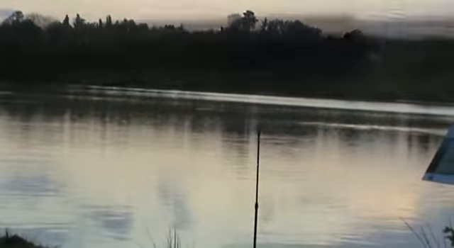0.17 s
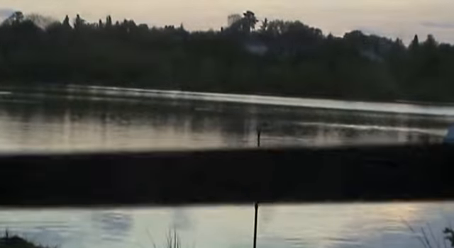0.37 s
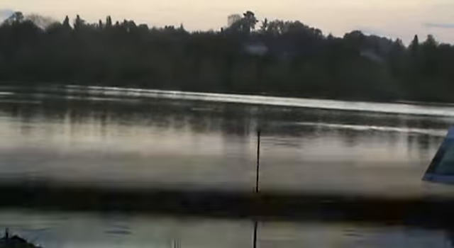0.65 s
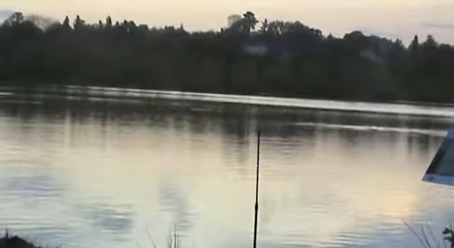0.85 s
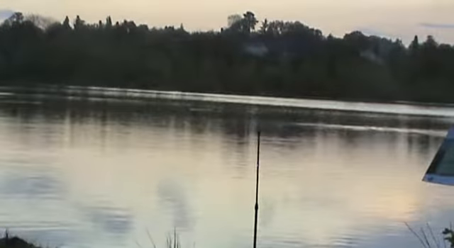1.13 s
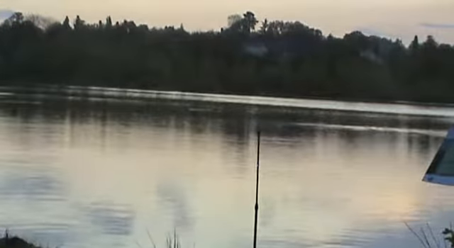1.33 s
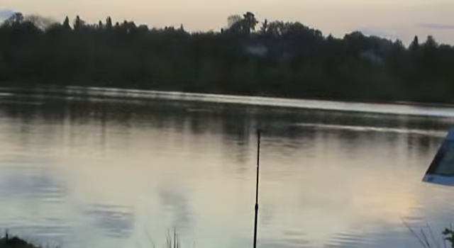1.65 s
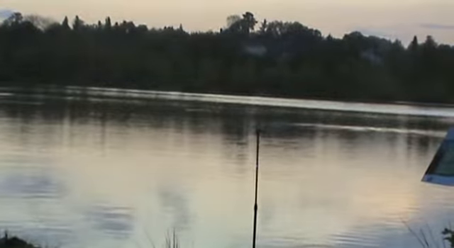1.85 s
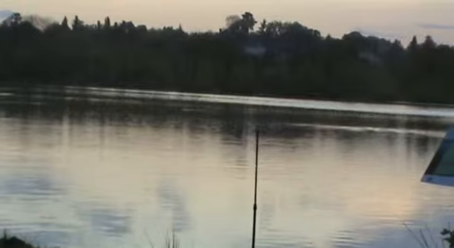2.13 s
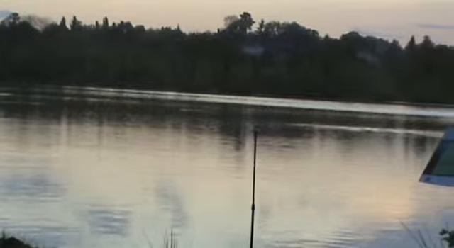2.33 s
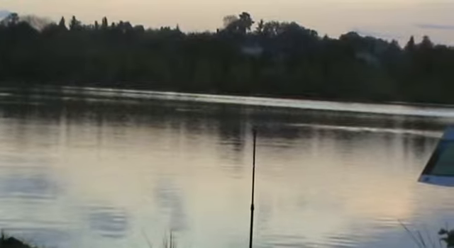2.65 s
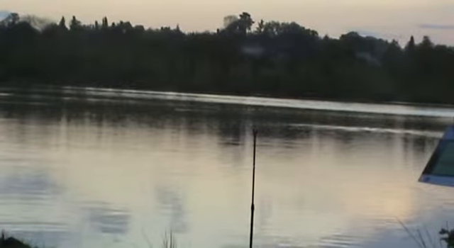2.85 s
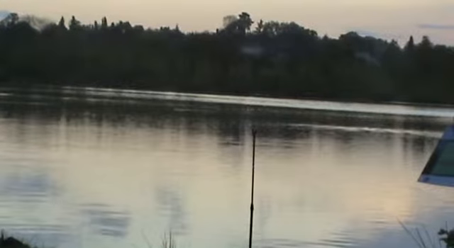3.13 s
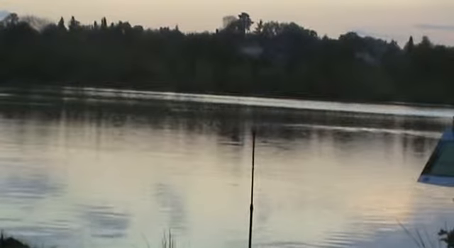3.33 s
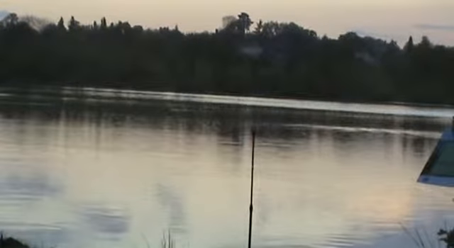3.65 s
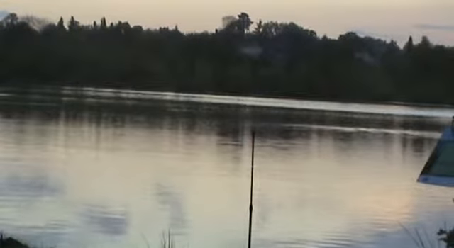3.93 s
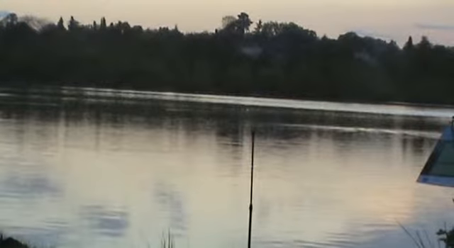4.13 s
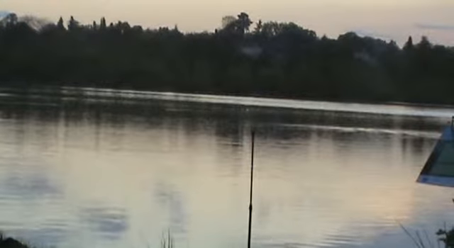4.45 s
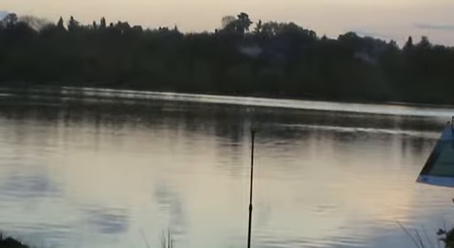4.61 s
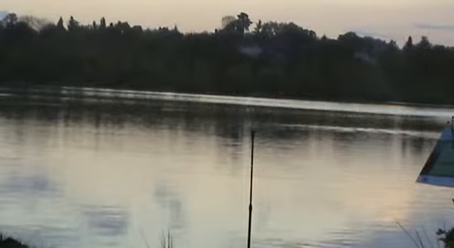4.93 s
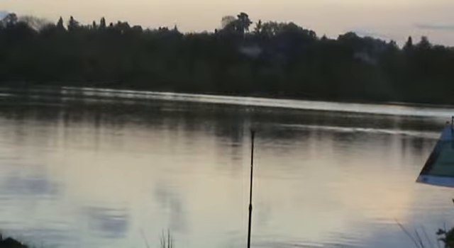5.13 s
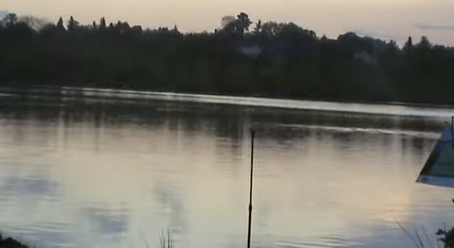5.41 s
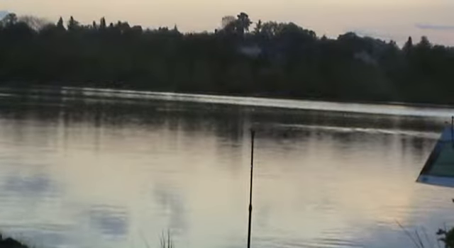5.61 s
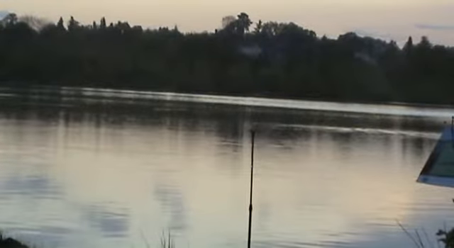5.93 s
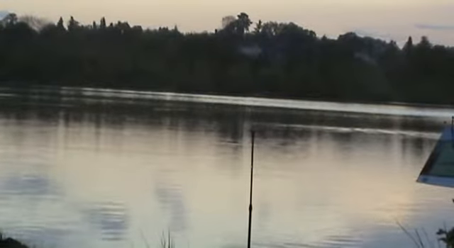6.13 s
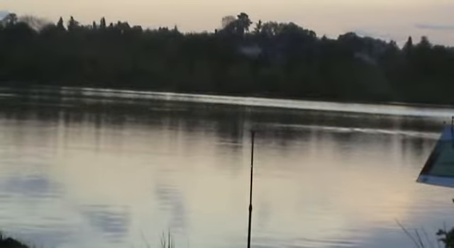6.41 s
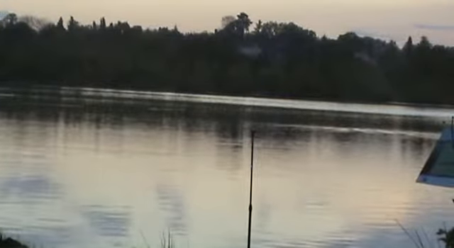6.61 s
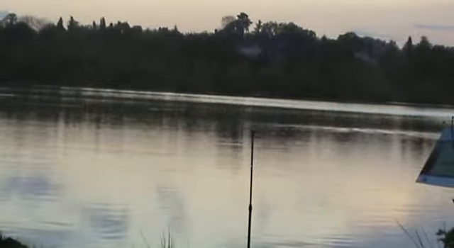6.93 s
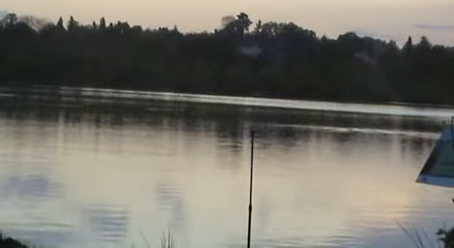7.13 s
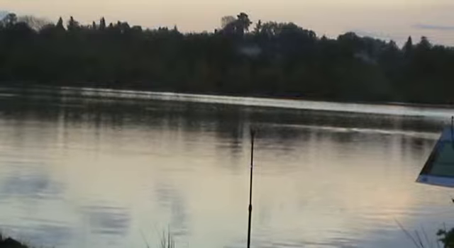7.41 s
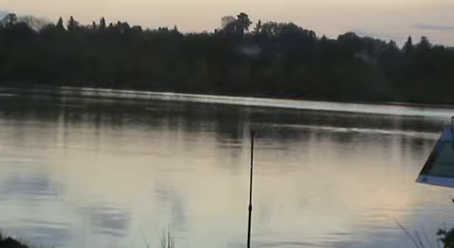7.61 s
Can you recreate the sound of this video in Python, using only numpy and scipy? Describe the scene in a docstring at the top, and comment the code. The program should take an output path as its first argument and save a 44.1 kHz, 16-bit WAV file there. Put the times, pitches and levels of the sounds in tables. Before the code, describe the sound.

Sharp tackle snaps, light knocks and a gear thump close by, with rustling sleeves, over faint birds piping across a quiet lake.

```python
"""A still lake shore at dawn. Close by, an angler handles tackle: filtered pulses make snaps and knocks,
damped modes make thumps, shaped noise makes rustling sleeves and scuffs, a short glide a line squeak.
Bending near-sine notes make a bird piping on the right, slurring birds on the left, chirps and a far
twitter. A hoarse yelp and a dove's coo are unsteady harmonics; behind lie noise for the air, a low drone
and soft microphone buffets."""
import sys
import numpy as np
from scipy import signal
from scipy.fft import rfft, irfft, next_fast_len
from scipy.io import wavfile

SR = 44100
rng = np.random.default_rng(int(sys.argv[2]) if len(sys.argv) > 2 else 0)


def waveform_to_disk(signal):
    """Save audio, clipped to [-1, 1], as 16-bit WAV at the path in sys.argv[1]."""
    frames = np.transpose(np.atleast_2d(signal))
    scaled = np.clip(frames, -1, 1) * 32767
    samples = np.round(scaled).astype(np.int16)
    wavfile.write(sys.argv[1], SR, samples)


N = 342171
TIME_S = np.arange(N) / SR

# Left-right is the left channel's level above the right's.
# Hard snaps of the tackle: (time [s], level [dB], pitch factor [ratio])
SNAPS = [(0.648, -28, 1.23), (1.7803, -43, 1.1), (1.821, -42, 0.91), (5.7564, -28, 1.06),
         (5.7666, -15.5, 1.03), (5.783, -8, 1.024), (5.864, -35, 0.96), (5.8903, -13.5, 1.01),
         (5.9259, -31.5, 0.92), (6.6517, -29.5, 1.1), (6.6534, -29.5, 0.47), (7.288, -34, 0.81)]
# Snap spectrum before the pitch factor: (frequency [Hz], relative level [dB])
SNAP_SPECTRUM = [(200, -42), (1500, -9), (2700, -7), (3600, -20.5), (4400, -8), (5100, -8), (6100, 4.5),
                 (7700, -1.5), (9500, -9), (13000, -29)]
# Single knocks on the rod: (time [s], level [dB], pitch [Hz])
KNOCKS = [(.2497, -45.5, 1180), (.314, -35, 736), (.8915, -43, 760), (1.431, -47.5, 1100),
          (1.5452, -47, 970), (2.2762, -40, 1120), (2.965, -47.5, 1070), (5.377, -43, 859),
          (5.5128, -45, 760), (5.7599, -25.5, 1930), (5.8412, -31.5, 1660), (5.8912, -34, 1660),
          (6.6521, -23, 1130), (6.8528, -42.5, 1340), (7.2992, -47, 1000), (7.7319, -41, 780)]
# Knock spectrum: (multiple of its pitch [ratio], relative level [dB])
KNOCK_SPECTRUM = [(.1, -17), (.45, -8), (.8, -1), (1.1, 1.5), (1.5, -12), (2.2, -12), (5, -30)]
# Clatters at the far end of the rod: (time [s], length [s], first bounce level [dB], mean pitch [Hz])
CLATTERS = [(4.775, 0.013, -46, 1300), (4.7856, 0.014, -33, 1050), (5.414, .03, -47.5, 1240),
            (5.7622, 0.019, -27.5, 1530), (5.779, 0.022, -30, 1460), (5.811, .014, -35.5, 1650),
            (5.845, .022, -32.5, 1460), (5.892, .03, -39.5, 1590), (6.652, 0.0073, -28.5, 1157)]
# Modes of the rod and its rest: (frequency [Hz], relative level [dB], t60 [s])
ROD_MODES = [(1055, 8.5, 0.2), (1253, -1, 0.18), (1277, 18.5, 0.033), (1544, 17, 0.081), (1950, -18, 0.12),
             (2060, 1.5, 0.31)]
# Thumps of gear set down: (time [s], level [dB], pitch factor [ratio], left-right [dB])
THUMPS = [(.041, -44.5, 0.78, -1), (.3145, -40.5, 1.17, -1), (.3325, -35.5, 1.94, -1), (1.80, -50, 0.82, 1),
          (6.6535, -15.5, 0.992, -3), (7.2701, -33, 1.26, -3)]
# Modes of that gear before the pitch factor: (frequency [Hz], relative level [dB], t60 [s])
GEAR_MODES = [(135, -27, .035), (236, 10.5, 0.024), (269, -9.5, 0.12), (370, -14, 0.11), (548, -2, 0.035),
              (636, -16, 0.071), (1090, -27, .04), (2530, -8.5, 0.013)]
# Sleeve rustle: (time [s], dull rub level [dB], bright swish level [dB])
SLEEVES = [(0, -63.5, -65), (.5, -65, -74), (.92, -60.5, -67), (1.1, -65, -71.5), (2.1, -62.5, -65.5),
           (2.48, -56, -58.5), (2.8, -66.5, -71), (3.4, -84, -80), (4, -75, -67.5), (4.68, -64.5, -61),
           (4.9, -64, -73), (5.2, -65.5, -69), (5.44, -57.5, -63.5), (6.05, -67, -64.5), (6.75, -60, -65),
           (7.1, -66.5, -69), (7.38, -56, -57.5), (7.6, -63, -71)]
# Scuffs of cloth and hand: (time [s], length [s], level [dB], relative hollow level [dB], left-right [dB])
SCUFFS = [(0.03, 0.039, -48.5, -8.5, -7), (0.058, 0.019, -48, -1.5, -6), (.315, 0.065, -44, 0.5, -5.5),
          (.37, 0.069, -60.5, 2.5, -5), (.595, .11, -57, -8.5, -8), (0.866, 0.19, -61, -7, -9),
          (2.342, 0.083, -50, -27, -1), (3.567, 0.23, -62.5, -20, 0), (4.101, 0.16, -58, -16, -1),
          (4.263, 0.074, -54.5, -29, 1), (4.424, 0.024, -51, -21, -2), (4.44, 0.082, -54.5, -14, 0),
          (4.534, 0.012, -48, -20, 1), (4.738, .085, -46, -1.5, -6), (4.805, 0.052, -53.5, -13, -6),
          (4.949, .075, -54.5, -9, -7), (5.002, 0.084, -51.5, -7.5, -6.5), (6.654, .19, -56, -6, -7)]
# Dull rub of cloth: (frequency [Hz], relative level [dB])
RUB_SPECTRUM = [(100, -8), (250, 3), (450, 3.5), (750, 2), (1400, 0.5), (2500, 0), (4000, -6.5),
                (8000, -44)]
# Bright swish of cloth: (frequency [Hz], relative level [dB])
SWISH_SPECTRUM = [(500, -58), (2500, -3), (4500, 0), (6300, 2), (8500, 1), (11000, -8.5), (13500, -19)]
# Scuff scrape: (frequency [Hz], relative level [dB])
SCRAPE_SPECTRUM = [(300, -59), (1500, -2.5), (3000, -1), (4500, -1), (7500, 1), (9500, -3), (11500, -13),
                   (13500, -43)]
# Sizzle of light scuffs: (frequency [Hz], relative level [dB])
SIZZLE_SPECTRUM = [(800, -6), (3000, -0.5), (4500, -8), (5500, 3), (7500, 2), (9000, -3), (11000, -3),
                   (13500, -13)]
# Hollow tackle under a scuff: (frequency [Hz], relative level [dB])
HOLLOW_SPECTRUM = [(60, -37), (200, 4.5), (700, -2.5), (1100, -0.5), (1500, 2), (2000, -7.5), (3000, -7),
                   (5000, -26)]
# Squeak of line under the fingers: (time [s], length [s], start [Hz], end [Hz], level [dB])
SQUEAK = (5.0325, .012, 6100, 8500, -44)
# Piping bird's sagging notes: (time [s], length [s], start [Hz], level [dB])
PIPES = [(0.072, .13, 2890, -66), (0.275, .047, 2890, -67), (1.32, 0.062, 3050, -62.5),
         (1.414, 0.043, 3140, -61), (1.462, 0.064, 3104, -57.5), (1.528, .055, 3100, -65.5),
         (1.834, 0.079, 3080, -60.5), (1.966, .15, 3066, -58.5), (2.466, 0.08, 3070, -55),
         (2.599, 0.14, 3077, -55.5), (3.077, .16, 3035, -55.5), (3.313, .123, 3102, -56.5),
         (3.728, 0.086, 3016, -58.5), (3.875, .15, 2990, -59.5), (4.43, 0.14, 3020, -67.5),
         (4.663, 0.094, 3100, -64), (5.175, .16, 2966, -67), (5.401, .11, 3090, -65)]
# Slurred notes of the birds on the left: (time [s], length [s], start [Hz], middle [Hz], end [Hz], level [dB])
SLURS = [(.876, .17, 1850, 2314, 2230, -59.5), (.934, 0.076, 2750, 2266, 1600, -62.5),
         (0.99, .09, 2550, 2990, 2630, -65.5), (1.084, 0.043, 2380, 2470, 2510, -62.5),
         (1.331, .12, 2000, 1710, 1590, -64.5), (1.605, 0.14, 2540, 1996, 2260, -61),
         (1.982, 0.051, 2450, 2800, 3080, -64.5), (3.057, .036, 2400, 2290, 2180, -68),
         (3.313, .071, 2400, 2290, 2290, -71), (3.855, .18, 1000, 1073, 1330, -67.5),
         (4.23, 0.052, 2120, 2080, 2330, -68.5), (4.335, 0.048, 2050, 2230, 2110, -67.5),
         (5.462, 0.156, 1990, 2086, 2020, -61), (5.587, .052, 2246, 2390, 2380, -65),
         (5.933, 0.144, 3450, 3390, 3370, -71), (6.055, 0.048, 2500, 2550, 2540, -64),
         (6.16, 0.071, 2600, 2940, 3320, -61.5), (6.53, .15, 1930, 1890, 1923, -69),
         (6.927, .05, 2230, 2275, 2250, -67.5)]
# Nearest small birds' straight glides: (time [s], middle pitch [Hz], total glide [Hz], level [dB])
CHIRPS = [(.475, 3970, 600, -67.5), (.85, 3330, -250, -63.5), (1.25, 3800, -700, -69),
          (1.595, 3380, -1300, -66), (5.253, 4200, 700, -66), (5.515, 5600, -280, -66),
          (5.561, 4070, -900, -70), (5.675, 4600, -1400, -66), (5.945, 4830, -900, -66),
          (6.107, 3900, -1000, -66.5), (6.22, 4770, -900, -68), (6.5, 3730, 350, -74),
          (6.89, 4470, -800, -68), (7.405, 3040, -200, -60.5), (7.452, 2820, -200, -72),
          (7.508, 3080, -200, -66.5), (7.623, 3140, -700, -66.5)]
# Water bird's falling yelp: (time [s], pitch [Hz], level [dB])
YELP = [(3.87, 700, -86), (3.89, 677, -59), (3.935, 611, -57.5), (3.962, 542, -61.5), (3.99, 525, -80)]
# Far dove's coo: (time [s], pitch [Hz], level [dB])
COO = [(3.2, 506, -90), (3.32, 521.5, -73.5), (3.55, 522, -84), (3.72, 514, -80)]
# Open air: (frequency [Hz], relative level [dB])
AIR_SPECTRUM = [(15, -49), (25, -11.5), (76, 1.5), (186, -6.5), (249, -8), (445, -10), (508, -10.5),
                (1150, -10.5), (1420, -12), (2350, -19), (3060, -18.5), (4090, -18.5), (5330, -21.5),
                (12700, -24.5), (13800, -29)]
# Open air between the channels: (frequency [Hz], likeness [0 to 1])
AIR_LIKENESS = [(30, 0.87), (100, 1), (300, 0.12), (1000, 0.06), (3000, 0.059), (12000, 0.57)]
# Buffets as the microphone is handled: (peak time [s], time to change by BUFFET_FADE_DB [s], level [dB])
BUFFETS = [(.31, 0.084, -45), (6.255, 0.042, -44), (6.4, 0.22, -51), (6.68, 0.49, -53)]

SNAP_SIDE_DB, ROD_SIDE_DB = -6.5, -4.5
KNOCK_TRAVEL_S, BOUNCE_TRAVEL_S = 0.00039, 0.003
BOUNCE_GAP_S, BOUNCE_GAP_JITTER, BOUNCE_FADE_DB, BOUNCE_DETUNE = 0.005, 0.358, 15, 0.08
SCUFF_RISE_SHARE = 0.4
PIPE_SAG_MIDDLE_HZ, PIPE_SAG_END_HZ, PIPE_SIDE_DB = 136.2, 173, -8.5
SLUR_SIDE_DB = 4.5
CHIRP_S, CHIRP_SIDE_DB = 0.042, -7.5
BUFFET_FADE_DB = 25


def amp(db):
    """Decibels to gain."""
    return 10 ** (np.asarray(db) / 20)


def unit(x):
    """Scales to an rms of 1."""
    return x / np.sqrt(np.mean(x ** 2) + 1e-20)


def read(points, hz):
    """Reads a spectrum on a log-frequency axis."""
    f, value = np.transpose(points)
    return np.interp(np.log(hz + 1e-6), np.log(f), value)


def follow(rows):
    """Interpolates a timed table's columns at every sample."""
    times_s, *columns = np.transpose(rows)
    return [np.interp(TIME_S, times_s, column) for column in columns]


def pan(side_db):
    """Left and right gains, of mean 1, for a level difference."""
    gains = amp([[side_db / 2], [-side_db / 2]])
    return gains / gains.mean()


def add(mix, start_s, sound):
    """Mixes a stereo sound in at a given time."""
    part = mix[:, max(round(start_s * SR), 0):][:, :sound.shape[1]]
    part += sound[:, :part.shape[1]]


def drift(rate_hz):
    """Smooth noise of rms 1, low-passed by a Gaussian of this width."""
    lowpass = np.exp(-(np.fft.rfftfreq(N, 1 / SR) / rate_hz) ** 2)
    return unit(irfft(rfft(rng.standard_normal(N)) * lowpass, N))


def colour(x, spectrum):
    """Filters a long sound by a spectrum, to rms 1."""
    size = next_fast_len(N)
    gain = amp(read(spectrum, np.fft.rfftfreq(size, 1 / SR)))
    return unit(irfft(rfft(x, size) * gain, size)[..., :N])


def pair(length, apart):
    """Noise shared by both channels, plus a part of opposite sign in each."""
    common, side = rng.standard_normal((2, length))
    return unit(np.array([common + apart * side, common - apart * side]))


def shore(x, t60_s):
    """Diffuse echo from the trees round the lake, as decaying noise."""
    t = np.arange(SR) / SR
    tail = rng.standard_normal((2, SR)) * amp(-60 * t / t60_s) * (1 - np.exp(-t / 0.014))
    return signal.fftconvolve(x, unit(tail) / np.sqrt(SR), axes=1)[:, :N]


def modes_ring(modes, t, pitch=1.0, signs=None):
    """Sums decaying sines, one a mode."""
    signs = np.ones(len(modes)) if signs is None else signs
    return sum(sign * amp(db - 60 * t / t60_s) * np.sin(2 * np.pi * hz * pitch * t)
               for sign, (hz, db, t60_s) in zip(signs, modes))


def impact(spectrum, travel_s=0., pitch_hz=1000., size=4096):
    """A minimum-phase pulse of peak 1; bending waves carry its treble ahead of its bass."""
    hz = np.fft.rfftfreq(size, 1 / SR)
    log_gain = np.log(amp(read(spectrum, hz)))
    mirrored = np.r_[log_gain, log_gain[-2:0:-1]]
    phase = -signal.hilbert(mirrored).imag[:len(hz)]
    lag = 4 * np.pi * travel_s * np.sqrt(pitch_hz * hz)  # group delay is travel_s at pitch_hz
    pulse = irfft(np.exp(log_gain + 1j * (phase - lag)))[:size // 2]
    return pulse / abs(pulse).max()


def rattle(pulse, ring_db, ring_t60_s, tail_db, tail_t60_s):
    """A pulse, its quick scattering inside the tackle, and a faint tail from the bank."""
    t = np.arange(SR // 4) / SR
    decay = amp(ring_db - 60 * t / ring_t60_s) + amp(tail_db - 60 * t / tail_t60_s)
    response = pair(len(t), 0.31) * decay * (1 - np.exp(-t / 0.00023))
    response[:, 0] = 1  # direct pulse
    return signal.fftconvolve(pulse[None], response, axes=1)


def blows():
    """Knocks, and clatters as uneven runs of fading bounces: (time [s], level [dB], pitch [Hz], travel [s])."""
    out = [(*row, KNOCK_TRAVEL_S) for row in KNOCKS]
    for start_s, length_s, first_db, hz in CLATTERS:
        after_s = 0
        for gap_shift, detune in rng.uniform(-1.1, 1, size=(20, 2)):
            if after_s < length_s:
                db = first_db - BOUNCE_FADE_DB * after_s / length_s
                out.append((start_s + after_s, db, hz * (1 + BOUNCE_DETUNE * detune), BOUNCE_TRAVEL_S))
            after_s += BOUNCE_GAP_S * (1 + BOUNCE_GAP_JITTER * gap_shift)
    return out


def tackle(rod_db=-35):
    """Sharp snaps, and knocks that chirp downward after running along the rod and leave it ringing."""
    out, t = np.zeros((2, N)), np.arange(SR // 4) / SR
    for s, db, pitch in SNAPS:
        pulse = impact([(hz * pitch, level) for hz, level in SNAP_SPECTRUM])
        snap = rattle(pulse, ring_db=-25, ring_t60_s=0.022, tail_db=-52, tail_t60_s=0.32)
        add(out, s, pan(SNAP_SIDE_DB) * amp(db) * snap)
    for s, db, hz, travel_s in blows():
        pulse = impact([(hz * ratio, level) for ratio, level in KNOCK_SPECTRUM], travel_s, hz)
        knock = rattle(pulse, ring_db=-27.5, ring_t60_s=0.042, tail_db=-40, tail_t60_s=0.22)
        add(out, s, pan(ROD_SIDE_DB) * amp(db) * knock)
        # where the rod is struck sets the sign of each mode; drawn at random
        ring = modes_ring(ROD_MODES, t, signs=rng.choice([-1, 1], len(ROD_MODES)))
        add(out, s + travel_s, pan(ROD_SIDE_DB) * amp(db + rod_db) * ring)
    return out


def thumps(contact_s=0.00059):
    """Soft blows ring the low, well damped modes of the gear."""
    out, t = np.zeros((2, N)), np.arange(SR // 4) / SR
    highpass = signal.butter(4, 80, "highpass", fs=SR, output="sos")  # small things radiate no deep bass
    for s, db, pitch, side_db in THUMPS:
        ring = modes_ring(GEAR_MODES, t, pitch) * (1 - np.exp(-t / contact_s))
        ring = signal.sosfilt(highpass, ring)
        add(out, s, -pan(side_db) * amp(db) * ring / abs(ring).max())  # starts with a negative swing
    return out


def cloth(grain_db=1.5, slip_db=2.0, flutter_db=1.88):
    """Fibres catch and slip: a soft rustle, and scuffs that also sound the hollow tackle."""
    rub_db, swish_db = follow(SLEEVES)
    catches = amp(grain_db * drift(1300) + flutter_db * drift(29))
    out = pan(-4) * colour(pair(N, 0.87) * catches, RUB_SPECTRUM) * amp(rub_db)
    out += pan(-6) * colour(pair(N, 0.52) * catches, SWISH_SPECTRUM) * amp(swish_db)
    slips = amp(slip_db * drift(280))
    scrape = colour(pair(N, 0.41) * slips, SCRAPE_SPECTRUM)
    hollow = colour(pair(N, 0.099) * slips, HOLLOW_SPECTRUM)
    sizzle = colour(pair(N, 0.23) * slips, SIZZLE_SPECTRUM)
    for start_s, length_s, db, hollow_db, side_db in SCUFFS:
        crest_s, end_s = start_s + SCUFF_RISE_SHARE * length_s, start_s + length_s
        span = slice(round(start_s * SR), round(end_s * SR))
        stroke = np.interp(TIME_S[span], [start_s, crest_s, end_s], [0, 1, 0]) ** 0.67
        light = np.clip(-hollow_db / 15, 0, 1)  # a lighter touch sizzles more and scrapes less
        scuff = np.sqrt(1 - light ** 2) * scrape[:, span] + light * sizzle[:, span]
        scuff += amp(hollow_db) * hollow[:, span]
        add(out, start_s, pan(side_db) * amp(db) * stroke * scuff)
    return out


def whistle(length_s, start_hz, middle_hz, end_hz, waver, soft=0.14, octave_db=-27, scoop=0.094,
            scoop_s=0.00477):
    """A near-pure note that scoops up into its start, bends through three pitches and wavers."""
    u = np.linspace(0, 1, max(round(length_s * SR), 64))
    bend = np.polyfit([0, .5, 1], [start_hz, middle_hz, end_hz], 2)
    hz = np.polyval(bend, u) * (1 - scoop * np.exp(-u * length_s / scoop_s))
    pitch_waver, level_waver = waver[:, :len(u)]
    phase = 2 * np.pi * np.cumsum(hz * (1 + .004 * pitch_waver)) / SR
    tone = np.sin(phase) + amp(octave_db) * np.sin(2 * phase)
    return unit(tone * signal.windows.tukey(len(u), soft) * amp(1.4 * level_waver))


def squeak(jitter=7.2, side_db=-4):
    """The line sticks and slips faster as it is pulled taut: a rough rising glide."""
    s, length_s, start_hz, end_hz, db = SQUEAK
    out, waver = np.zeros((2, N)), np.array([jitter * drift(2500), 2 * drift(800)])
    note = whistle(length_s, start_hz, (start_hz + end_hz) / 2, end_hz, waver, soft=.9)
    add(out, s, pan(side_db) * amp(db) * note)
    return out + amp(-10) * shore(out, t60_s=0.074)


def songs():
    """Pipes, slurs and chirps: (time, length [s], start, middle, end [Hz], level, left-right [dB])."""
    pipes = [(s, length_s, hz, hz - PIPE_SAG_MIDDLE_HZ, hz - PIPE_SAG_END_HZ, db, PIPE_SIDE_DB)
             for s, length_s, hz, db in PIPES]
    slurs = [(*row, SLUR_SIDE_DB) for row in SLURS]
    chirps = [(s, CHIRP_S, hz - glide_hz / 2, hz, hz + glide_hz / 2, db, CHIRP_SIDE_DB)
              for s, hz, glide_hz, db in CHIRPS]
    return pipes + slurs + chirps


def birds(near_db=-54, far_db=-64, slur_waver=3.4, steep_hz=900, scatter_db=-5, wet_db=-12):
    """Level whistles are purer, steep slurs waver; fainter singers arrive scattered by the trees."""
    direct, scattered = np.zeros((2, 2, N))
    waver = np.array([drift(89), drift(45)])
    for s, length_s, start_hz, middle_hz, end_hz, db, side_db in songs():
        far = np.clip((db - near_db) / (far_db - near_db), 0, 1)
        steep = min(abs(end_hz - start_hz) / steep_hz, 1.3)
        depth = np.array([[0.32 + slur_waver * steep ** 2], [0.35 + 0.79 * steep]])
        note_waver = depth * np.roll(waver, -round(s * SR), 1)
        note = pan(side_db) * amp(db) * whistle(length_s, start_hz, middle_hz, end_hz, note_waver)
        add(direct, s, note * (1 - 0.049 * far * steep))
        add(scattered, s, note * far * (0.74 + 0.58 * steep))
    return direct + amp(scatter_db) * shore(scattered, t60_s=0.12) + amp(wet_db) * shore(direct, t60_s=0.21)


def call(rows, overtones_db, rough, side_db, wet_db, flutter_db):
    """A throaty call across the water: a few unsteady harmonics on a jittering pitch, with echo."""
    hz, db = follow(rows)
    turns = np.cumsum(hz * (1 + rough * drift(187))) / SR
    voice = unit(sum(amp(level + flutter_db * drift(50)) * np.sin(2 * np.pi * k * turns)
                     for k, level in enumerate(overtones_db, start=1)))
    sounding = (TIME_S > rows[0][0]) * (TIME_S < rows[-1][0])
    out = pan(side_db) * voice * amp(db) * sounding
    return out + amp(wet_db) * shore(out, t60_s=0.7)


def chorus(count=170, floor_db=-79, spread_db=8.3, wet_db=2, low_hz=2000, high_hz=4300):
    """Many small birds far off: short random slurs with strong echo."""
    out, waver = np.zeros((2, N)), np.array([6 * drift(147), 3 * drift(57)])
    for when, length, pitch, bend, glide, loud, side in rng.random((count, 7)):
        hz = low_hz * (high_hz / low_hz) ** pitch
        slope = 0.3024 * (glide - .6)
        middle_hz = hz * (1 + 0.1368 * (bend - .5))
        note_waver = np.roll(waver, -int(when * N), 1)
        note = whistle(0.02486 + .05 * length, hz * (1 - slope), middle_hz, hz * (1 + slope), note_waver)
        add(out, when * N / SR, pan(10 * (side - .5)) * amp(floor_db + spread_db * loud) * note)
    return out + amp(wet_db) * shore(out, t60_s=3.0)


def air(hush_db=-61.5, swell_db=1.5, drone_hz=72, drone_db=-71):
    """Quiet open air as swelling noise, a far low unsteady drone, and soft buffets on the microphone."""
    size = next_fast_len(N)
    same = np.clip(read(AIR_LIKENESS, np.fft.rfftfreq(size, 1 / SR)), -1, 1)
    a, b = rfft(rng.standard_normal((2, size)))
    hush = colour(irfft(np.array([a, same * a + np.sqrt(1 - same ** 2) * b]), size), AIR_SPECTRUM)
    throb = amp(2.2 * drift(18))
    drone_turns = np.cumsum(drone_hz * (1 + 0.1084 * drift(18.2))) / SR
    drone = unit(np.sin(2 * np.pi * drone_turns) * throb)
    rumble = [(8, 11.5), (25, 8), (50, 1), (100, -9), (200, -31), (800, -57), (3000, -90)]  # (Hz, dB)
    buffets = colour(pair(N, 0.45), rumble)
    handling = sum(amp(db - BUFFET_FADE_DB * abs(TIME_S - s) / fade_s) for s, fade_s, db in BUFFETS)
    hush_level = amp(hush_db + swell_db * drift(6.2))
    return pan(-0.41) * hush * hush_level + amp(drone_db) * drone + buffets * handling


def scene():
    """The angler's near sounds over birds and air."""
    yelp = call(YELP, [-24, -4.5, -2.5, -1.5, -16, -20, -10, -10], rough=0.0215, side_db=5, wet_db=-3,
                flutter_db=4.5)
    dove = call(COO, [0, -22], rough=0.0085, side_db=-1, wet_db=1.5, flutter_db=2.0)
    angler = tackle() + thumps() + cloth() + squeak()
    return angler + birds() + yelp + dove + chorus() + air()


def record(dry, low_cut_hz=32, edge_hz=13900):
    """The microphone's bass roll-off and the recorder's band limit."""
    highpass = signal.butter(2, low_cut_hz, "highpass", fs=SR, output="sos")
    thinned = signal.sosfilt(highpass, dry)
    lowpass = signal.firwin(301, edge_hz, window=("kaiser", 8), fs=SR)
    return signal.oaconvolve(thinned, lowpass[None], "same", axes=1)


dry = scene()
out = record(dry)
waveform_to_disk(out)
```